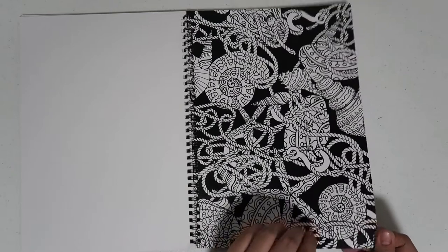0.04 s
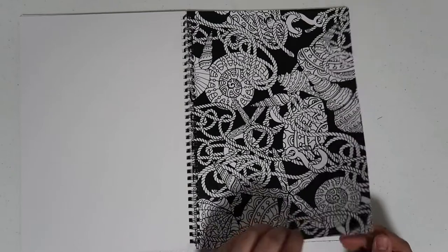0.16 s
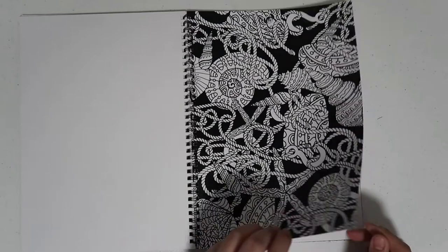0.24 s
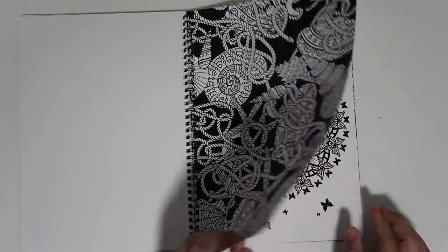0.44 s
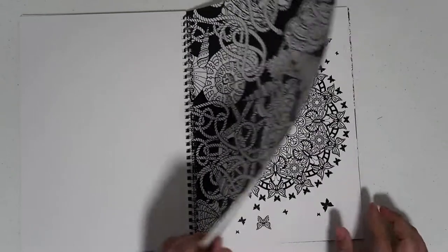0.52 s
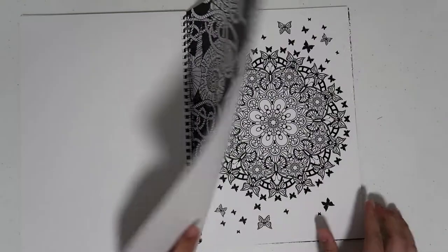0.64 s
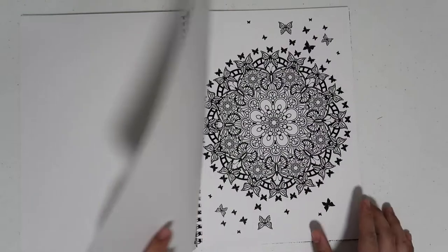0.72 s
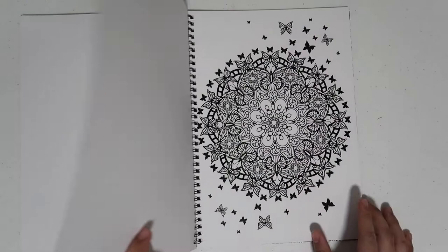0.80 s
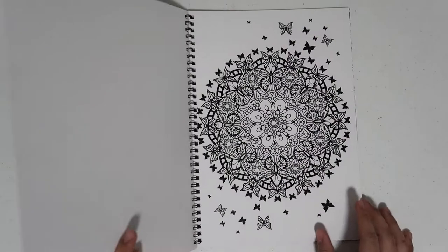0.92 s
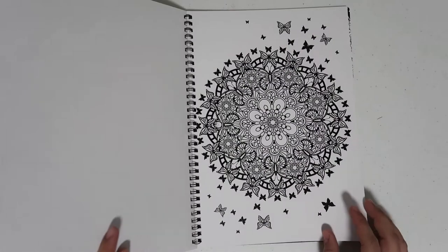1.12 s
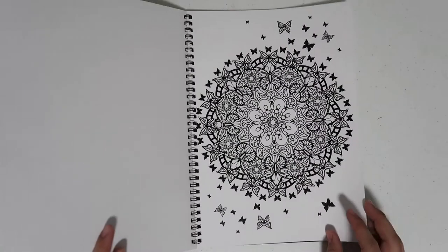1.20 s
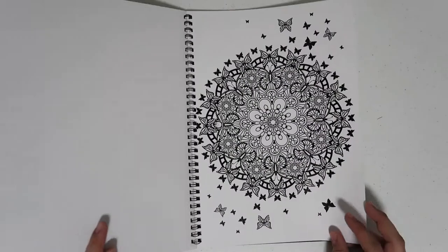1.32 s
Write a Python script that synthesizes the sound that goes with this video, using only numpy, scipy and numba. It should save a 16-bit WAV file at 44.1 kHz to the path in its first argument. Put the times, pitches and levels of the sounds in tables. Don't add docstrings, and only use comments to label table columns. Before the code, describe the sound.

Page turn: heavy paper pops sharply once, then brushes over and settles in a quiet room.

```python
import sys
import numpy as np
from scipy import signal
from scipy.fft import rfft, irfft
from scipy.io import wavfile
from scipy.ndimage import uniform_filter1d
from numba import njit

SR = 44100
rng = np.random.default_rng(int(sys.argv[2]) if len(sys.argv) > 2 else 0)


def dump_mix(stems):
    frames = np.atleast_2d(stems).T
    limited = np.clip(frames, -1, 1)
    pcm = np.round(limited * 32767).astype(np.int16)
    wavfile.write(sys.argv[1], SR, pcm)


def to_linear_factor(level_db):
    exponent = np.asarray(level_db, float) / 20
    return 10 ** exponent


N = 59535


def level(x, db):
    return x * to_linear_factor(db) / np.sqrt(np.mean(x ** 2))


@njit
def svf(x, hz, k):
    y, b, l = np.empty(len(x)), 0., 0.
    for i in range(len(x)):
        g = np.tan(np.pi * hz[i] / SR)
        v = (b + g * (x[i] + 1e-18 - l)) / (1 + g * (g + k))
        b, l, y[i] = 2 * v - b, l + 2 * g * v, k * v
    return y


def band(x, hz, width_hz):
    return svf(x, np.full(len(x), 1. * hz), width_hz / hz)


def colour(x, points):
    f = np.maximum(np.arange(len(x) // 2 + 1) * SR / len(x), 1)
    p = np.array(points, float)
    gain_db = np.interp(np.log(f), np.log(p[:, 0]), p[:, 1])
    return irfft(rfft(x) * to_linear_factor(gain_db), len(x))


def walk(rate):
    k = int(SR / rate)
    steps = np.repeat(rng.standard_normal(N // k + 1), k)
    w = uniform_filter1d(uniform_filter1d(steps, k), k)[:N]
    return w / w.std()


def add(out, s, x, db):
    i = int(s * SR)
    out[i:i + len(x)] += (x * to_linear_factor(db) / np.abs(x).max())[:N - i]


# f/Hz, width/Hz, level/dB
HUM_BANDS = [(79, 30, -55), (121.1, 17.6, -49.5), (174.4, 8.4, -52), (408, 63, -60)]
# f/Hz, level/dB
AIR_SPECTRUM = [(40, -9.5), (70, -3.5), (129, -7.5), (288, -14), (800, -22.5), (2770, -33), (6000, -40),
                (15000, -75.5)]
# f/Hz, level/dB
AIR_SIDE_SPECTRUM = [(60, -52), (150, -15), (400, -5.5), (1500, -3.5), (4000, -0.5), (9000, -1.5),
                     (14000, 22.5)]


def background():
    hum_hz, hum_db, air_db = 58, -42.5, -45.5
    wobble_rad, waver_db = .25, .9
    t = np.arange(N) / SR
    phase = 2 * np.pi * hum_hz * t + wobble_rad * walk(4.8)
    hum = to_linear_factor(hum_db) * np.sqrt(2) * np.sin(phase) * to_linear_factor(waver_db * walk(10.1))
    for hz, width, db in HUM_BANDS:
        noise = rng.standard_normal(N)
        hum = hum + level(band(band(noise, hz, width), hz, width), db)
    mid, side = (level(colour(rng.standard_normal(N), AIR_SPECTRUM), air_db) * to_linear_factor(0.47 * walk(11.6))
                 for _ in range(2))
    return hum + mid, colour(side, AIR_SIDE_SPECTRUM)


# f/Hz, level/dB
ROOM_SPECTRUM = [(100, -6), (400, 3.9), (1000, -2), (1600, 1), (2800, 3), (4500, -5.5), (9000, -11)]


def room(x):
    t60_s, gap_ms, early_db, early_ms = 0.46, 11, 1.5, 54
    room_db, side_db = -8, -17
    t = np.arange(int(.6 * SR)) / SR
    fade = to_linear_factor(-60 * t / t60_s) * (t > gap_ms / 1000)
    wet = []
    for _ in range(2):
        diffuse = rng.standard_normal(len(t))
        reflections = rng.random(len(t)) < .006
        early = to_linear_factor(early_db) * 8 * np.exp(-t * 1000 / early_ms) * reflections
        tail = fade * (diffuse + early)
        tail = colour(tail / np.sqrt(np.sum(tail ** 2)), ROOM_SPECTRUM)
        wet.append(signal.fftconvolve(x, tail)[:N])
    return to_linear_factor(room_db) * wet[0], to_linear_factor(room_db + side_db) * wet[1]


# t/s, level/dB, hiss against level/dB
RUB_COURSE = [(0, -78, 3), (.06, -64, -3), (0.098, -43.5, -20), (.2, -48.5, -10.5), (.26, -48, -20.5),
              (.45, -46, -21.5), (0.541, -46, -20), (.58, -43, -24.5), (.7, -47, -19.5),
              (.76, -41.5, -25.5), (.84, -43, -22), (.92, -48.5, -15), (0.978, -55.5, -11),
              (1.2, -52.5, -19), (1.272, -56, -7.5), (1.35, -61.5, -3)]
# f/Hz, width/Hz, level/dB
SHEET_MODES = [(450, 114, 8), (946, 810, 15.5), (1698, 300, 9.5), (2700, 580, 6.5), (3660, 770, -30)]
# start t/s, length t/s, f/Hz, level/dB
EDGE_SQUEAKS = [
    (0.128, 0.084, 3530, -55),
    (0.555, 0.06, 2500, -43),
    (0.646, .04, 2320, -53),
    (0.852, 0.048, 680, -47),
    (0.878, 0.073, 450, -48.5),
]


def rub():
    grains_per_s, scatter_db, drift, flicker_db = 2700, 0.5, .05, 2.5
    hiss_hz, hiss_width_hz, hiss_side = 6500, 7000, 0.7
    t, course = np.arange(N) / SR, np.array(RUB_COURSE)
    slips = rng.random(N) < grains_per_s / SR
    grains = slips * rng.standard_normal(N) * to_linear_factor(scatter_db * rng.exponential(size=N))
    body = np.zeros(N)
    for hz, width, db in SHEET_MODES:
        centre = hz * (1 + drift * walk(14))
        mode = svf(svf(grains, centre, width / hz), centre, 0.98 * width / hz)
        body += level(mode, db) * to_linear_factor(flicker_db * walk(59.86))
    gain = to_linear_factor(np.interp(t, course[:, 0], course[:, 1]))
    brightness_db = np.interp(t, course[:, 0], course[:, 2])
    flick = gain * to_linear_factor(brightness_db + 1.8 * walk(29))
    hiss, wide = (flick * level(band(rng.standard_normal(N) + 1.2 * grains, hiss_hz, hiss_width_hz), 0)
                  for _ in range(2))
    out = gain * level(body, -2) + hiss
    for s, length, hz, db in EDGE_SQUEAKS:
        gate = np.sin(np.pi * np.clip((t - s) / length, 0, 1)) ** 0.88
        friction = grains + 0.23 * rng.standard_normal(N)
        out = out + gate * level(band(band(friction, hz, hz / 8), hz, hz / 8), db)
    return out, hiss_side * wide


# t/s, peak level/dB, ring f/Hz, crack against ring level/dB, length t/ms
CREASE_EVENTS = [(.092, -19.5, 1204, 1, 1.96), (0.214, -27, 8900, -17, 2.7), (.2306, -20, 2330, -11, 4.7),
                 (.231, -20.5, 10100, -18, 2.2), (0.5228, -33.5, 2500, -22, 2.2),
                 (0.5601, -23, 2410, -32, 2.9), (0.5602, -24.5, 1026, -17.5, 3.6),
                 (0.5767, -33, 2130, -5, 3), (.739, -29.5, 2240, -12, 4), (0.7426, -27, 1296, -16, 1.4),
                 (0.7857, -26, 2240, -18, .3), (0.7879, -34.5, 2140, -21, 1.9), (.846, -31, 2720, -8, 3.1),
                 (0.85, -34, 754, -19, 3.6), (1.001, -40, 1800, 1.5, 6.3), (1.052, -40.5, 2110, -2, 2.5),
                 (1.175, -42, 360, -25, 4.8), (1.1765, -34.5, 980, -8.5, 1), (1.18, -38.5, 1470, -15, 1.5),
                 (1.234, -27, 3920, 17, 2.8), (1.238, -36, 1250, -3, 1.5), (1.28, -34, 6000, -9, 2.4),
                 (1.29, -37, 1520, 1.5, 2.8)]
# f/Hz, level/dB
CREASE_SPECTRUM = [(30, -18), (55, 14.2), (3500, -0.2), (6000, -6.5), (12000, -20), (16000, -21)]


def creases():
    ring_q, crack_hz, crack_width_hz, clicks_per_ms = 1.26, 3750, 3800, 2.6
    tail_db, tail_ms = -11, 5.8
    out, ms = np.zeros(N), np.arange(2600) / SR * 1000
    for s, db, hz, crack_db, length in CREASE_EVENTS:
        chance, strength, rustle = rng.random((3, 2600))
        struck = chance < clicks_per_ms * 1000 / SR
        clicks = struck * (strength - .5) * np.exp(-ms / length) + 0.52 * (ms == 0)
        clicks = clicks + to_linear_factor(tail_db) * (rustle - .5) * np.exp(-ms / tail_ms) * 0.49
        crack = band(band(clicks, crack_hz, crack_width_hz), crack_hz, crack_width_hz)
        ring = band(band(clicks, hz, hz / ring_q), hz, hz)
        add(out, s, level(ring, 0) + level(crack, crack_db), db)
    return colour(out, CREASE_SPECTRUM)


# t/s, peak level/dB, ring f/Hz, width/Hz,
# overtone level/dB
BUCKLE_EVENTS = [
    (.2154, -25, 2300, 1200, -12),
    (.2157, -17, 3000, 900, -15),
    (.2324, -12.5, 1050, 650, -2),
    (.2382, -21, 1250, 900, -1),
    (.2412, .4, 1250, 450, .1),
    (.2447, -9, 1480, 620, -6),
    (.2486, -12, 1350, 600, -6),
    (.2545, -21, 1550, 600, -4),
]
# f as share of ring, width as share of ring width, level/dB
BUCKLE_PARTIALS = [(.3, 0.72, -16.5), (1.8, 0.37, -24.5), (2.8, 1.17, -27.5), (4.5, 2.9, -38)]


def buckle_ring(hz, width):
    ring = -1. * (np.arange(1200) == 0)
    for _ in range(3):
        ring = band(ring, hz, width)
    return ring / np.abs(ring).max()


def buckles():
    out = np.zeros(N)
    for s, db, hz, width, over_db in BUCKLE_EVENTS:
        snap = buckle_ring(hz, width)
        for ratio, width_ratio, part_db in BUCKLE_PARTIALS:
            snap = snap + to_linear_factor(part_db + over_db) * buckle_ring(hz * ratio, width * width_ratio)
        add(out, s, snap, db)
    return out


def scene():
    pan_db, side_db = 0.56, -17
    hits = buckles() + creases()
    sheet, sheet_side = rub()
    wet, wet_side = room(hits + 0.79 * sheet)
    mid, side = background()
    near = hits + sheet
    side = side + wet_side + sheet_side + to_linear_factor(side_db) * np.gradient(near) * 3
    left_right = to_linear_factor(np.array([[pan_db], [-pan_db]]) / 2)
    return near * left_right + wet + mid + side * np.array([[1], [-1]])


def roll_off(x):
    return signal.sosfilt(signal.butter(12, 15600, fs=SR, output="sos"), x)


def record(dry):
    duck_db, duck_at_s, attack_s, release_s = -5, 0.27, 0.0013, 0.59
    since = np.arange(N) / SR - duck_at_s
    gain_db = duck_db * np.clip(since / attack_s, 0, 1) * np.exp(-np.maximum(since, 0) / release_s)
    mix = np.tanh(0.58 * dry) / 0.58 * to_linear_factor(gain_db)
    return roll_off(mix)


dry = scene()
out = record(dry)
dump_mix(out)
```